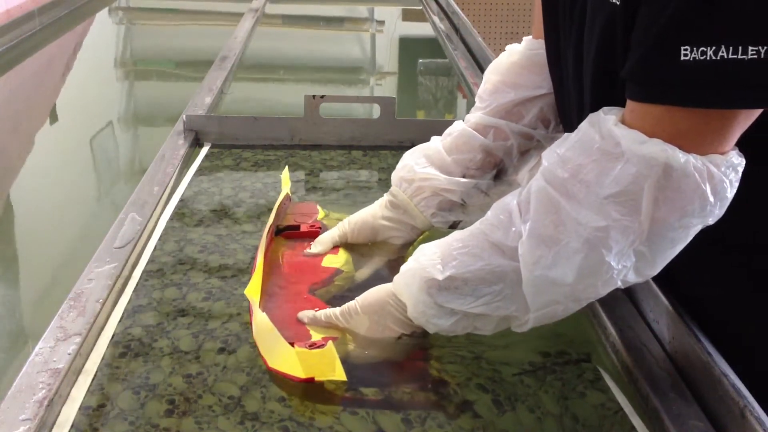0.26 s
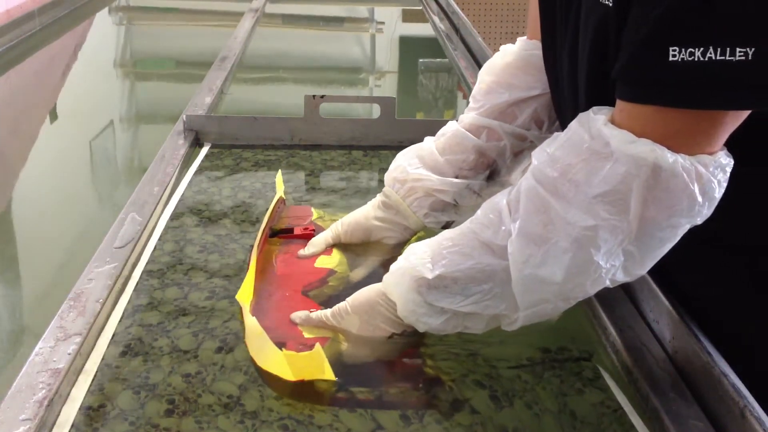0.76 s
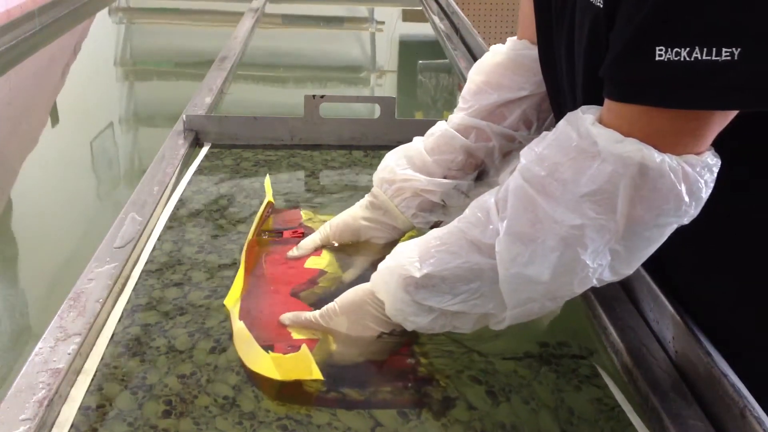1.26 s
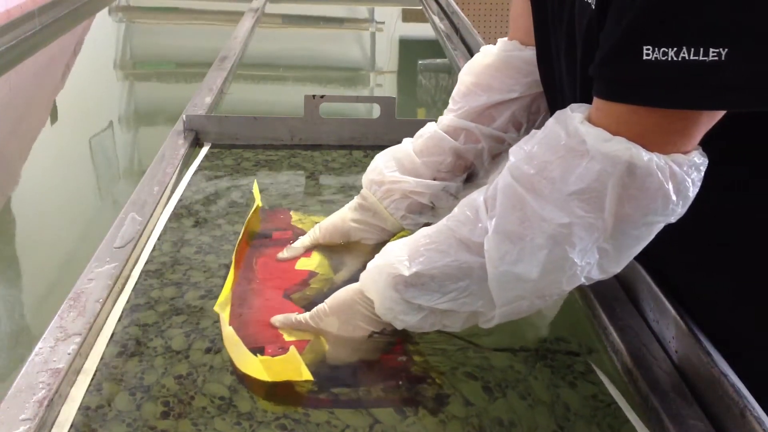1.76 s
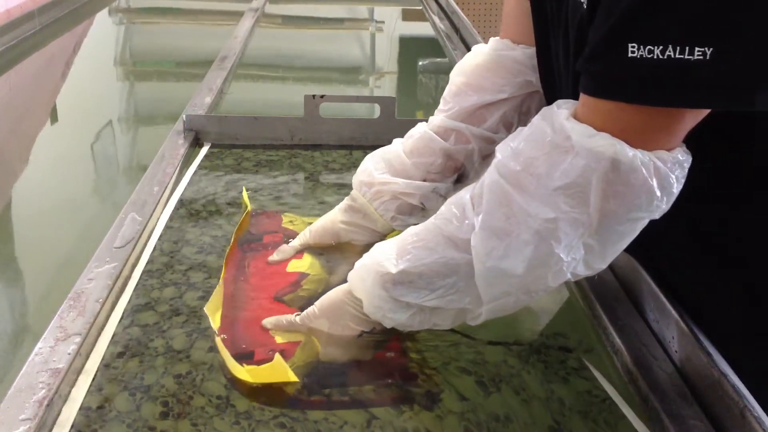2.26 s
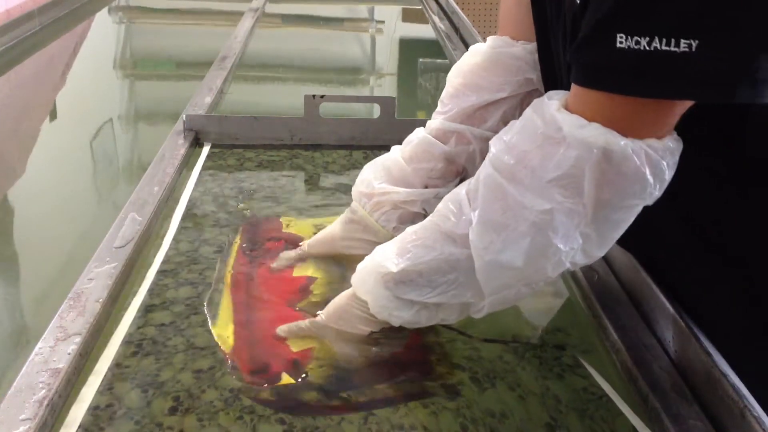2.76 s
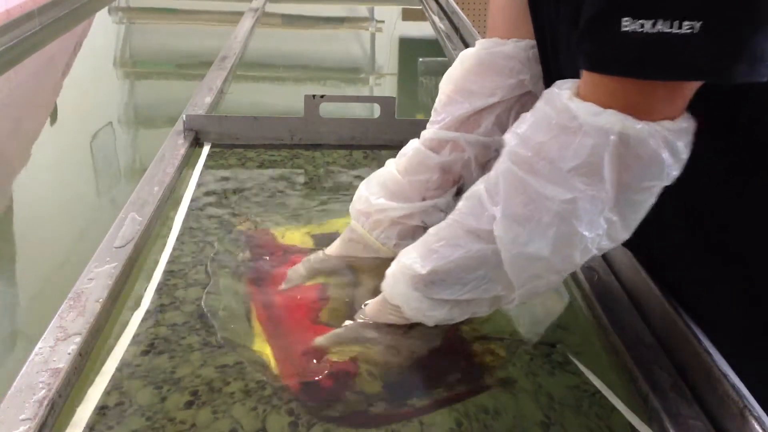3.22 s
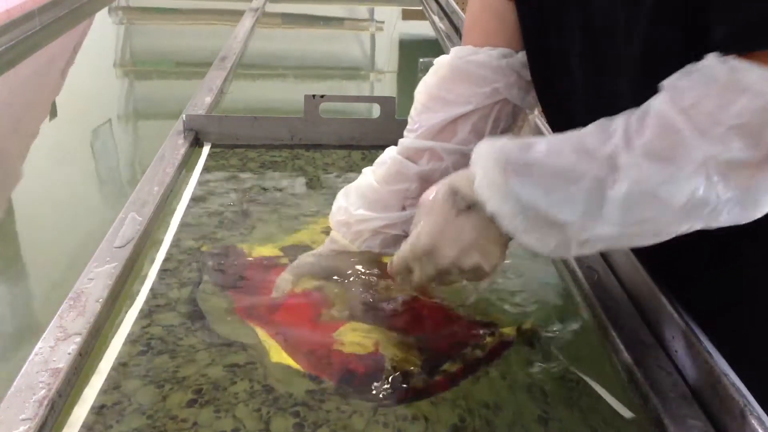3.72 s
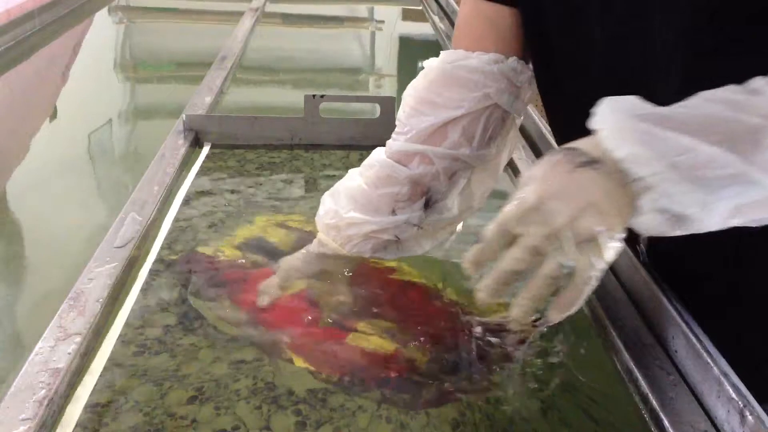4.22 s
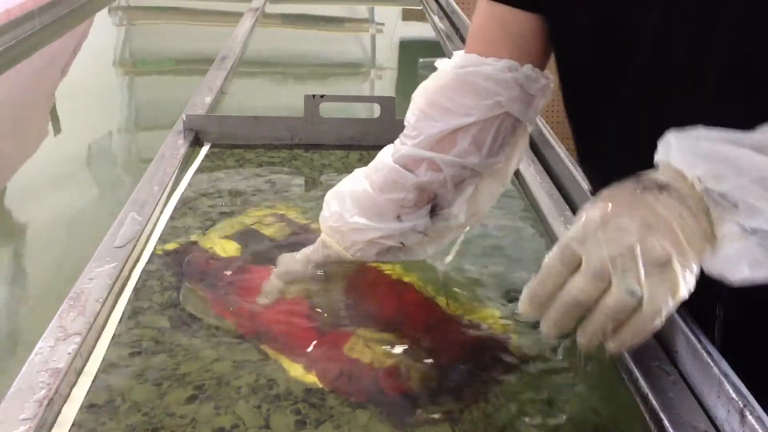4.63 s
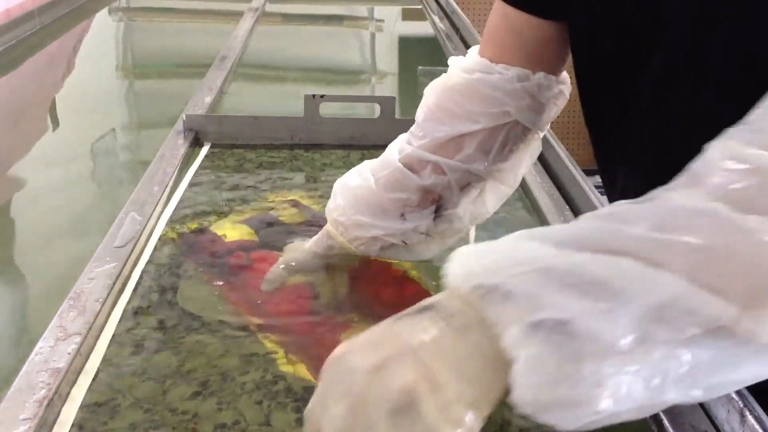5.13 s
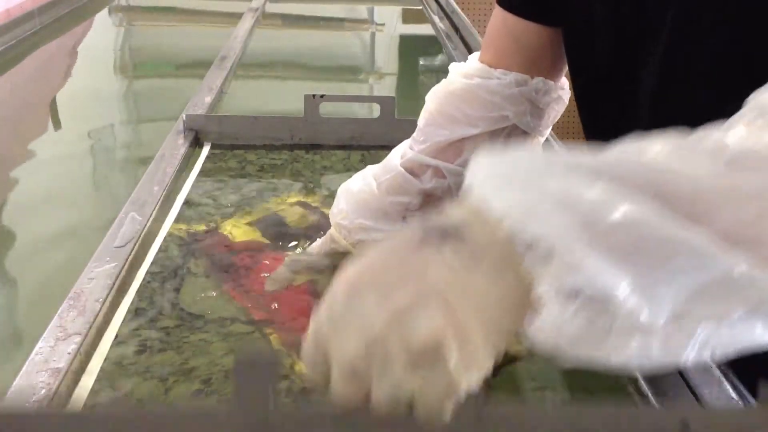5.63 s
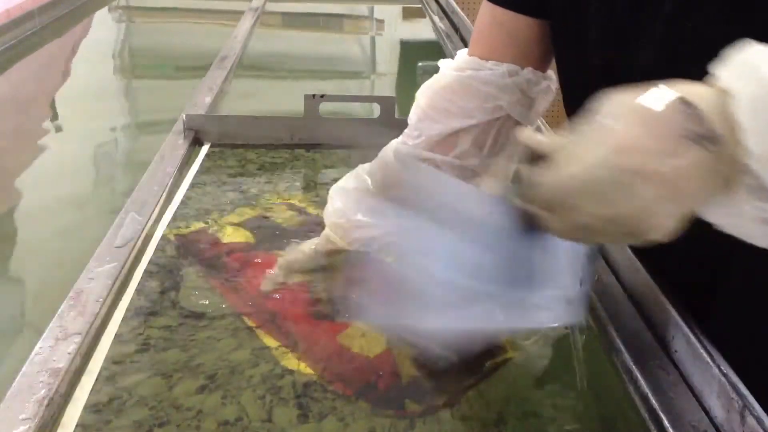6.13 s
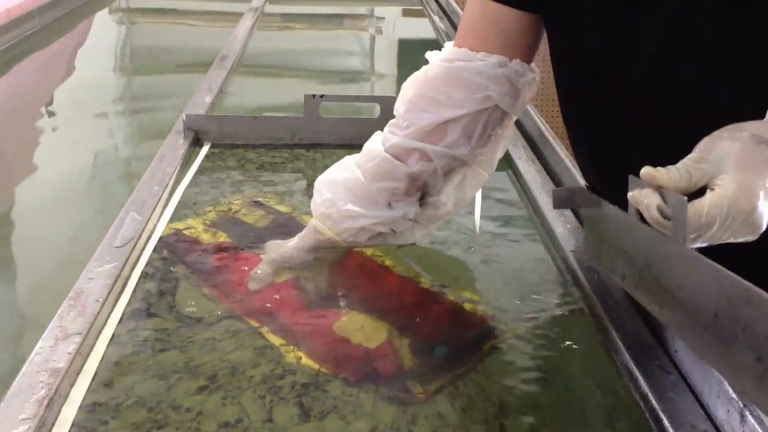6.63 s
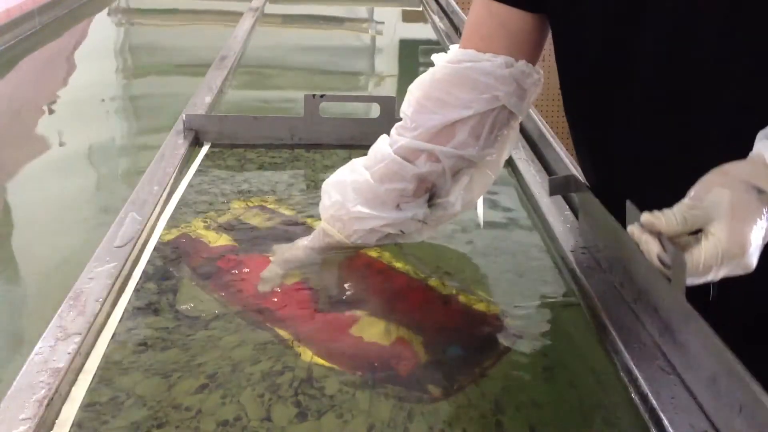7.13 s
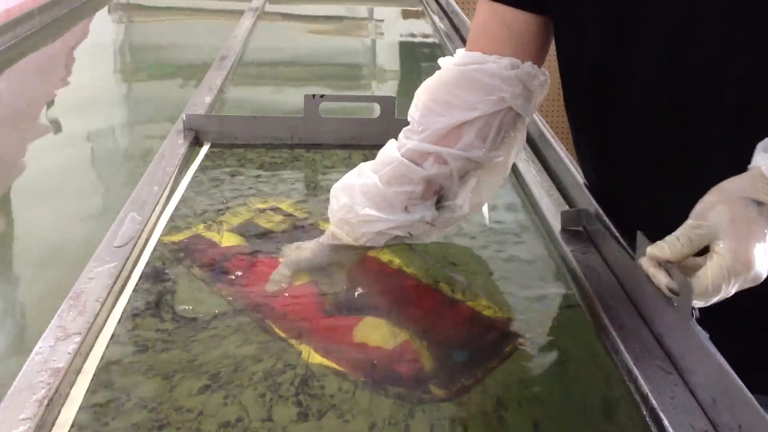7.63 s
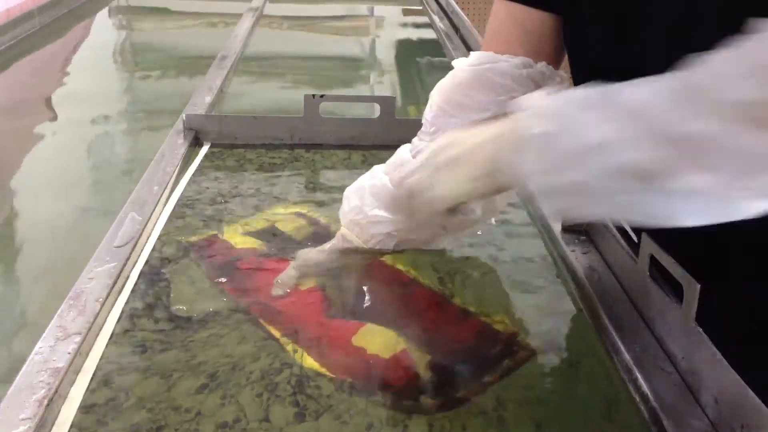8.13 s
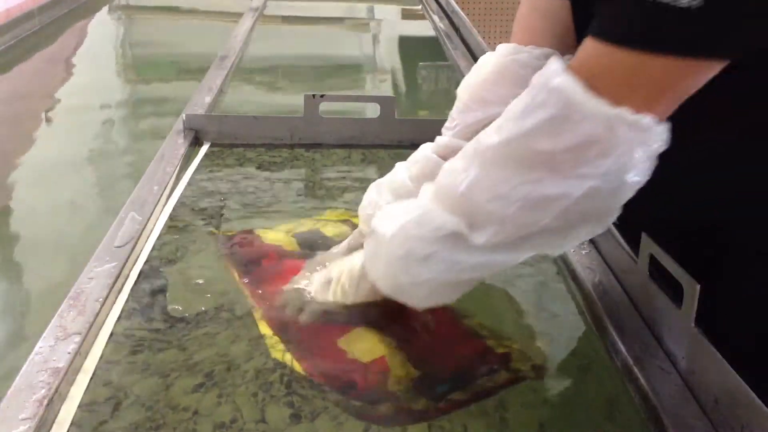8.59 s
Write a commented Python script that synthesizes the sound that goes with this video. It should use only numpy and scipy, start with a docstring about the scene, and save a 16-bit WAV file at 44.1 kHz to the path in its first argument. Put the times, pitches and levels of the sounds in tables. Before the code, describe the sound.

A quiet, echoing open workshop: soft airy background, a faint low motor hum wavering slightly, a high pulsing cricket trill in phrases, and a distant bird repeating short falling whistles throughout. For the first 2.5 seconds little else happens, only a few tiny fabric ticks. From about 2.7 wet plastic sleeves and gloves begin to rustle, growing from 3.4 with crisp snaps and small bubbly drips ringing close by. A soft dull bump comes at 4.6, and rustling continues. At 5.45 to 5.55 a steel bar gives several quick light knocks as it is lifted, followed by more crackles until 6.1. After a brief lull, metal lands at 6.9, then clatters hard and fast from 7.15 to 7.65, bright and sharp with dull thumps beneath, loudest near 7.4 to 7.6. The steel rings and decays through the hall while sleeves swish around 7.8 to 8.7, ending with bird notes.

```python
"""A motor hums, a cricket trills and a far bird repeats a falling call in an open, echoing workshop.
Gloved hands hold a part under water in a steel dipping tank: sleeves rustle, drops ring as bubbles.
A steel divider bar is lifted off the rim with light knocks, then set down with a clatter.
Hum, trill and call are tones; rustle is filtered noise; the bar's contacts excite decaying steel modes."""
import sys
import numpy as np
from scipy import signal
from scipy.fft import rfft, irfft, next_fast_len
from scipy.io import wavfile

SR = 44100
rng = np.random.default_rng(int(sys.argv[2]) if len(sys.argv) > 2 else 0)


def generate_wav(sig):
    """Save sig (samples, or channels by samples) to the path in sys.argv[1] as 16-bit PCM at SR."""
    pcm = np.round(np.clip(np.atleast_2d(sig).T, -1, 1) * 32767).astype(np.int16)
    wavfile.write(sys.argv[1], SR, pcm)


def amplitude_ratio(level_db):
    """Convert a level in decibels to the matching linear amplitude (field) ratio."""
    exponent = np.asarray(level_db, float) / 20
    return 10 ** exponent


N = 390726

# clearest modes of the struck tank [f/Hz, level/dB]
STEEL_MODES = [(178, -51), (194, -47.5), (223, -48), (317, -40.5), (345, -32.5), (375, -35), (490, -46),
               (565, -35.5), (618, -37.5), (721, -32.5), (802, -41), (856, -47), (1293, -47.5), (2575, -44),
               (3250, -56.5), (3800, -42.5), (4134, -40.5), (4550, -41.5), (5330, -44), (5560, -41.5),
               (5830, -29.5), (6130, -31.5), (6280, -42.5), (6700, -58), (7100, -45.5), (7257, -33.5),
               (7600, -48), (8107, -46.5), (8890, -46), (11000, -36), (11996, -36)]
# relative strength of the wet sleeves and gloves moving [t/s, level/dB]
RUSTLE = [(0.0, -88), (0.96, -79.5), (1.93, -78), (2.6, -76), (2.75, -72.5), (3.24, -74.5), (3.43, -63),
          (3.52, -68.5), (3.68, -65), (4.2, -69.5), (4.555, -71.5), (4.57, -59.5), (4.63, -61.5),
          (4.74, -67.5), (4.95, -64.5), (5.3, -71), (5.49, -65.5), (5.69, -63), (5.76, -62), (5.95, -62.5),
          (6.1, -67), (6.3, -68.5), (6.9, -75), (7.8, -53.5), (8.06, -68), (8.294, -60.5), (8.628, -68),
          (8.86, -81.5)]
DEEPEST_HZ = 106   # the steel sends out little below this


def in_time(rows):
    """Linear interpolation: the columns of a table as curves over all samples."""
    s, *columns = np.transpose(rows)
    return [np.interp(np.arange(N) / SR, s, c) for c in columns]


def at_hz(points, hz):
    """Interpolation on a log-frequency axis: a spectrum read at any frequency."""
    points_hz, points_db = np.transpose(points)
    return np.interp(np.log(hz), np.log(points_hz), points_db)


def hat(hz, centres, k):
    """Partition of unity: the share of centre k; neighbouring shares cross-fade and add up to 1."""
    return np.interp(np.log(hz), np.log(centres), np.arange(len(centres)) == k)


def rms_one(x):
    """Normalisation to unit mean power."""
    return x / np.sqrt(np.mean(x ** 2) + 1e-20)


def drift(rate):
    """Slow random modulation: normal points of spread 1, rate per second, joined by lines."""
    return np.interp(np.arange(N) * rate / SR, np.arange(1000), rng.standard_normal(1000))


def band(x, low_hz, high_hz):
    """Butterworth band-pass filtering."""
    edges_hz = [low_hz, min(high_hz, .45 * SR)]
    return signal.sosfilt(signal.butter(2, edges_hz, "band", fs=SR, output="sos"), x)


def coloured(x, spectrum):
    """Linear filtering: the sound's spectrum is multiplied by a magnitude curve."""
    size = next_fast_len(len(x))
    hz = np.linspace(1, SR / 2, size // 2 + 1)
    return irfft(rfft(x, size) * amplitude_ratio(at_hz(spectrum, hz)), size)[:len(x)]


def puffs(times, levels_db, lengths, grit=0):
    """Impulsive noise: abrupt onset, exponential decay, energy independent of length; grit adds lumps."""
    out = np.zeros(N)
    lumps = np.abs(rng.standard_normal(N // 40 + 1)).repeat(40)[:N] ** grit
    noise = rng.standard_normal(N) * lumps
    for s, level_db, length in zip(times, levels_db, lengths):
        start = round(s * SR)
        part = out[start:][:SR // 5]
        decay = np.exp(-np.arange(len(part)) / SR / max(length, 1e-4))
        burst = decay * noise[start:][:len(part)]
        part += amplitude_ratio(level_db) * burst / np.sqrt(np.sum(burst ** 2))
    return out


def air():
    """Broadband background: random noise shaped by a spectrum, its level wandering slowly."""
    # spectral density of the air sound [f/Hz, relative level/dB per Hz]
    air_spectrum = [(30, -33), (60, -32), (100, -9), (160, 2.5), (230, -1), (330, 4), (500, -1.5),
                    (1000, -5.5), (2500, -13.5), (5000, -12.5), (8400, -18), (9000, -24.5), (12000, -15),
                    (15500, -14.5)]
    level_db = -67 + 1.0 * drift(2.8)
    return amplitude_ratio(level_db) * rms_one(coloured(rng.standard_normal(N), air_spectrum))


def rumble():
    """Distant rumble: low band-limited noise under a level envelope."""
    # strength of the rumble [t/s, level/dB]
    rumble_levels = [(0.0, -102), (3.96, -77.5), (5.29, -99), (5.48, -69), (5.69, -71), (6.27, -81),
                     (6.9, -66), (7.8, -64), (8.4, -74), (8.7, -69), (8.86, -78)]
    level_db, = in_time(rumble_levels)
    return amplitude_ratio(level_db) * rms_one(band(band(rng.standard_normal(N), 100, 180), 70, 146))


def motor():
    """Harmonic series on the turning rate: a casing resonance lifts the overtone that meets it."""
    # motor speed [t/s, turns per s]
    speed = [(0.0, 24.1), (0.32, 23.9), (1.0, 24.4), (1.93, 24.8), (2.4, 24.7), (2.9, 24.3), (4.39, 24.2),
             (5.32, 24.65), (6.4, 24.3), (8.86, 24.3)]
    # overtones of the turning rate [multiple of the rate, relative level/dB]
    overtones = [(4, -92), (5, -96), (6, -78), (7, -77.5), (8, -82.5), (9, -76), (10, -81), (11, -84.5),
                 (12, -89.5), (13, -89.5), (14, -93.5)]
    # even running lifts even overtones and lowers odd ones; load lifts all
    # [t/s, evenness/dB, load/dB]
    running = [(0, 7, -3), (.34, 3, -2), (.9, 4, -0.5), (1.3, 2.5, 2), (2.45, 4.5, 1.5), (2.7, -4, -1.5),
               (3.6, -2.5, -1), (4.4, -1.5, -2), (4.9, -0.5, -1), (5.4, -4.5, 0), (5.9, -8, -3),
               (6.4, -2, -1.5), (8.86, -8.5, 3)]
    casing_hz, casing_wide_hz, casing_db = 198.4, 3.7, 10
    waver_rad = 1.2   # spread of each overtone's phase wander
    turns, = in_time(speed)
    even_db, load_db = in_time(running)
    phase, out = 2 * np.pi * np.cumsum(turns) / SR, 0
    for k, db in overtones:
        casing_lift_db = casing_db / (1 + ((k * turns - casing_hz) / casing_wide_hz) ** 2)
        parity_db = even_db * np.cos(np.pi * k)
        level_db = db + casing_lift_db + load_db + parity_db + 2.65 * drift(2.2)
        angle = k * phase + waver_rad * drift(7.9) + 2 * np.pi * rng.random()
        out = out + amplitude_ratio(level_db) * np.sin(angle)
    return np.sqrt(2) * out


def cricket():
    """Stridulation: each wing stroke gates a tone of uneven strength; far insects merge into hiss."""
    # phrases [first stroke t/s, level/dB, fade/dB per s]
    phrases = [(.007, -72, 1.5), (2.207, -71, 4), (3.915, -75, -1), (5.124, -72, 8)]
    # wing tones [f/Hz, relative level/dB]
    wings = [(8320, 4), (8100, -1.5)]
    strokes_per_s, swell_s, dip_db = 16.55, 0.36, 5   # each phrase swells in from a dip
    t = np.arange(N) / SR
    start, level_db, fade_db = np.transpose(phrases)
    phrase = np.maximum(np.searchsorted(start, t + .5 / strokes_per_s) - 1, 0)
    since = t - start[phrase]
    pulse = np.exp(2.9 * (np.cos(2 * np.pi * strokes_per_s * since) - 1))
    stroke = pulse * amplitude_ratio(2.5 * drift(25))
    tone = sum(amplitude_ratio(db) * np.sin(2 * np.pi * hz * t + 1.2 * drift(48)) for hz, db in wings)
    chorus = band(band(rng.standard_normal(N), 7030, 8900), 7100, 8630)
    effort_db = level_db[phrase] - fade_db[phrase] * since - dip_db * np.exp(-since / swell_s)
    return amplitude_ratio(effort_db) * rms_one(stroke * tone) + amplitude_ratio(-73.5) * rms_one(chorus)


def bird():
    """Multipath propagation: distance smears gliding notes into noise bands with echoing tails."""
    # notes [t/s, starting f/Hz, fall/Hz, level/dB]
    notes = [(.04, 4820, -6, -80), (.28, 5840, 103, -81), (0.716, 4690, 463, -73), (.88, 3730, 149, -74),
             (.98, 7100, 400, -76), (1.645, 4850, 128.5, -79), (2.858, 4460, 324, -70.5),
             (3.029, 3600, 4.5, -69), (4.718, 3740, 90, -67.5), (6.556, 4580, 445, -69.5),
             (6.678, 3640, 65, -67.5), (8.655, 3750, 67.5, -70.5), (8.821, 3700, 75, -69.5)]
    note_s, attack_s, tail_s = .14, 0.0061, 0.12
    out = np.zeros(N)
    t = np.arange(SR // 2) / SR
    for s, from_hz, fall_hz, level_db in notes:
        b, a = signal.butter(2, 134 + fall_hz, fs=SR)   # a steeper fall is blurred more widely
        blur = rms_one(signal.lfilter(b, a, rng.standard_normal((2, len(t)))))
        pitch_hz = np.interp(t, [0, note_s], [from_hz, from_hz - fall_hz])
        phase = 2 * np.pi * np.cumsum(pitch_hz) / SR
        shape = np.minimum(t / attack_s, 1) * np.exp(-np.maximum(t - note_s, 0) / tail_s)
        note = amplitude_ratio(level_db) * shape * (np.cos(phase) * blur[0] + np.sin(phase) * blur[1])
        part = out[round(s * SR):][:len(t)]
        part += note[:len(part)]
    return out


def rustle():
    """Frictional noise: each fold adds random crackles and a swish in its own independently varying band."""
    # spectral density of the fabric [f/Hz, relative level/dB per Hz]
    fabric = [(400, -19), (900, -1), (1500, -2.5), (3600, -1.5), (7300, 3.5), (9000, -1), (11000, -6),
              (14000, -2), (15500, -12.5)]
    swing_db, patchy_db, crackle_share = 1.6, 3.5, .35
    level_db, = in_time(RUSTLE)
    together, out = drift(24), 0
    for hz in 600 * 2 ** np.arange(0, 4.7, 2 / 3):
        crackles_per_s = 250 * amplitude_ratio(3.5 * drift(25) + 3.0 * together)
        sizes = amplitude_ratio(4.2 * np.minimum(rng.exponential(1, N), 5)) * (rng.random(N) < crackles_per_s / SR)
        crackle = signal.lfilter([1], [1, -.97], sizes) * rng.standard_normal(N)   # short decays
        swish = rng.standard_normal(N) * amplitude_ratio(swing_db * together + patchy_db * drift(15))
        fold = crackle_share * rms_one(crackle) + swish
        out = out + band(fold, hz / 2 ** (1 / 3), hz * 2 ** (1 / 3))
    return amplitude_ratio(level_db + 4.0) * rms_one(coloured(out, fabric))


def snaps():
    """Impulsive radiation of fabric and film: milliseconds of bright noise, tilted between low and top."""
    # single snaps [t/s, relative level/dB, tilt toward the dull side/dB]
    snap_rows = [(1.489, -43, -3.5), (1.596, -49, -23), (2.4094, -51, -9.5), (2.4474, -48, 9),
                 (2.7412, -50, -7), (2.808, -44, 7), (2.931, -45, -1), (3.0425, -47, 7), (3.336, -43, -1),
                 (3.429, -39, 10), (3.543, -43, 1), (3.614, -49, 14), (3.66, -41, 11), (3.6904, -43, 4.5),
                 (3.775, -39, 10.5), (3.897, -40, 12), (3.99, -40, 22), (4.024, -41, 3), (4.14, -58, 12),
                 (4.194, -45, 27), (4.229, -40, 15), (4.304, -43, 4), (4.364, -45, 2), (4.498, -46, 14.5),
                 (4.652, -41.5, -6), (4.778, -39, 8), (4.9861, -40, 14), (5.175, -47, 3), (5.187, -51, 12),
                 (5.243, -43, 20), (5.3366, -39.5, 18), (5.373, -43, 18), (5.419, -41, 0),
                 (5.7387, -36, 20), (5.797, -35.5, 19), (6.0293, -39.5, 2), (6.117, -54, 13),
                 (8.118, -36, -3.5), (8.161, -44, -9), (8.224, -42, 31), (8.5187, -42.5, 23),
                 (8.6705, -55, 12)]
    s, level_db, tilt_db = np.transpose(snap_rows)
    lasts = np.full(len(s), .0025)
    middle = puffs(s, level_db + 15.5 - np.abs(tilt_db) / 5, lasts)
    low = puffs(s, level_db - 19 + tilt_db / 2 + 20.5, lasts)
    top = puffs(s, level_db - 16 - tilt_db / 2 + 26.0, lasts)
    middle = band(band(middle, 3500, 9900), 5300, 9900)
    return middle + band(low, 2200, 6300) + band(top, 11200, 15500)


def drips():
    """Bubble resonance: a damped sine climbs in pitch near the surface; small ones follow the hands."""
    # single drops [t/s, relative level/dB, f/Hz]
    drops = [(2.6963, -61, 1820), (2.9916, -57, 3540), (3.5623, -56, 2580), (3.6174, -57, 1530),
             (3.636, -58, 1540), (3.64, -46, 4400), (3.6554, -51, 3270), (3.704, -49, 3840),
             (3.723, -52.5, 2400), (3.7644, -57, 2080), (3.925, -53, 4410), (3.885, -57, 2000),
             (4.0956, -55, 2390), (4.098, -64, 1900), (4.1694, -64, 3730), (5.1076, -62, 2260),
             (6.0591, -62, 3470), (6.1165, -55, 3237)]
    cycles, small_cycles, rise = 55.0, 20, 0.089   # cycles to fall 60 dB; pitch climb
    out, t = np.zeros(N), np.arange(SR // 10) / SR
    when, size, pitch = rng.random((900, 3)).T
    when = when * (N - SR // 10)
    at = when.astype(int)
    moving_db = in_time(RUSTLE)[0][at]
    small_db = moving_db + 10.0 + 5.0 * pitch - 12 * size + 2.0 * drift(12)[at]
    small = np.transpose([when / SR, small_db, 1700 * 5.5 ** pitch])
    for k, (s, level_db, hz) in enumerate(np.vstack([drops, small])):
        life = t * hz / (cycles if k < len(drops) else small_cycles)
        ring = np.sin(2 * np.pi * hz * t * (1 + rise * life))
        out[round(s * SR):][:len(t)] += amplitude_ratio(level_db - 60 * life) * ring
    return out


def wall_echoes(close):
    """Early reflections: two quick echoes off the tank walls follow the direct sound."""
    walls = np.zeros(SR // 30)
    walls[[0, round(.005 * SR), round(.017 * SR)]] = 1, .4, .3
    return signal.fftconvolve(close, walls)[:N]


def knock():
    """Damped impact: the wet glove bumps the tank wall as a soft burst of low-band noise."""
    return band(puffs([4.568], [-10], [0.02]), 142, 410)


def jolts():
    """Structure-borne shock: heavy landings push the microphone through the floor, one low pulse each."""
    # heavy landings [t/s, level/dB]
    landings = [(6.935, -47), (7.165, -58), (7.572, -47.5)]
    peak_s = .0025
    out, t = np.zeros(N), np.arange(SR // 10) / SR
    for s, level_db in landings:
        out[round(s * SR):][:len(t)] += amplitude_ratio(level_db) * t / peak_s * np.exp(1 - t / peak_s)
    return out


def steel_answer(dense, modes, modes_db, ring_s, tail_share, tail_db):
    """Modal impulse response of steel and hall: one row per range, dying band by band."""
    # centres of the ranges that contacts drive, dull to bright [f/Hz]
    ranges_hz = [280, 600, 1100, 2500, 6500, 12000]
    # tank and hall die away together [f/Hz, t60/s]
    tail = [(100, 0.76), (250, 3.73), (500, 2.03), (1000, 1.7), (2000, 0.96), (4000, 0.43), (8000, 0.5),
            (14000, 0.15)]
    early_t60_s, short_over_hz = 0.42, 399
    bands_hz = 40 * 2 ** np.arange(0, 8.7, .5)
    t = np.arange(3 * SR) / SR
    clear = 0
    for hz, db in modes:
        fall_db = 60 * t / ring_s * (hz / ranges_hz[0])   # higher modes ring shorter
        clear = clear + amplitude_ratio(db + modes_db - fall_db) * np.sin(2 * np.pi * hz * t)
    ringing = rfft(rms_one(coloured(rng.standard_normal(len(t)), dense)) + clear)
    rows, all_hz = np.zeros((len(ranges_hz), len(t))), np.linspace(1, SR / 2, len(ringing))
    for k, hz in enumerate(bands_hz):
        build = 1 - np.exp(-t * hz / 0.38)   # lows take longer to start
        # tail_share shortens the tail ever more over one octave, then by the same ratio above it
        shorter = (short_over_hz / np.clip(hz, short_over_hz, 2 * short_over_hz)) ** tail_share
        late = amplitude_ratio(tail_db - 60 * t / (at_hz(tail, hz) * shorter))
        dying = amplitude_ratio(-60 * t / early_t60_s) + late
        part = irfft(ringing * hat(all_hz, bands_hz, k)) * build * dying
        rows += [hat(hz, ranges_hz, j) * part for j in range(len(rows))]
    return rows / np.sqrt(np.mean(rows[:, :SR // 20] ** 2, axis=1, keepdims=True))


def bar(contacts, reach, answers, range_db, skid_db, skid_s, push_db):
    """Impact excitation: clicks and short skids drive the steel's ranges; the tank floor adds a dull push."""
    # share of the lean that each range takes, bright to dull [ratio]
    lean_share = [0, 0, 0, -.5, -1, 1]
    s, edge_db, weight_db, lean_db, sharp_db = np.transpose(contacts)
    levels = []
    for (edge_reach_db, weight_reach_db), share in zip(reach, lean_share):
        edge = amplitude_ratio(edge_db + edge_reach_db)
        weight = amplitude_ratio(weight_db + weight_reach_db + share * lean_db)
        levels.append(20 * np.log10(np.hypot(edge, weight)))
    levels[0] = levels[0] + sharp_db
    clicks, sign = np.zeros((len(levels), N)), rng.choice([-1, 1], len(s))
    clicks[:, np.round(s * SR).astype(int)] = sign * amplitude_ratio(np.array(levels))
    out = amplitude_ratio(push_db) * band(band(band(clicks[-1] + 1e-18, 100, 200), 95, 230), 95, 230)
    for answer, click, level_db, more_db in zip(answers[::-1], clicks, levels, range_db):
        drive = click + puffs(s, level_db + skid_db, np.full(len(s), skid_s), grit=1)
        out += amplitude_ratio(more_db) * signal.fftconvolve(drive, answer)[:N]
    return band(band(out, DEEPEST_HZ, SR), DEEPEST_HZ, SR)


def rail_knocks():
    """Light impacts: the bar knocks the cross rail as it is lifted, exciting the rail's modes."""
    # contacts [t/s, edge level/dB, weight level/dB, lean toward the deepest range/dB,
    # extra sharpness at the very top/dB]
    lift = [(5.4484, -35.5, -38, 0.5, 0.92), (5.4693, -36.5, -43.5, -5, 1), (5.4895, -38, -38.5, -2.5, 1),
            (5.5398, -37, -38, -1, 1)]
    # reach of a contact into each range, bright to dull [from the edge/dB, from the weight/dB]
    rail_reach = [(-0.5, -30), (-1, -30), (-7, -16), (-20, 0.5), (-30, -2.5), (-32.5, -4.5)]
    # clearest rail modes [f/Hz, relative level/dB]
    rail_modes = [(316, -54), (409.1, -48.5), (667, -48), (791.3, -60.5), (855.9, -46.5), (972, -71),
                  (1220, -61), (1809, -58), (1911, -52.5), (2050, -66), (2374, -70)]
    # dense rail modes [f/Hz, relative level/dB per Hz]
    rail_dense = [(50, -55), (90, -37), (200, -7.5), (270, -8), (400, -6), (540, -7), (620, -10.5),
                  (700, -0.5), (900, -6), (1040, -6), (1140, -15), (1300, -10.5), (1500, -13.5),
                  (1750, -12.5), (1920, -13), (2100, -14.5), (2300, -19), (6000, -22.5), (15500, -35)]
    answers = steel_answer(rail_dense, rail_modes, modes_db=45.5, ring_s=2.6, tail_share=0.6, tail_db=8.0)
    return bar(lift, rail_reach, answers, range_db=[-32.5, -20.5, -10.0, -11.5, -9.5, -11.0],
               skid_db=-1.5, skid_s=0.02, push_db=18)


def tank_blows():
    """Repeated impact: the bar clatters on the tank, its edge exciting bright modes, its weight dull ones."""
    # contacts [t/s, edge striking level/dB, weight landing level/dB,
    # lean toward the deep wall panels/dB, extra sharpness at the very top/dB]
    blows = [(4.5701, -53, -64, 5.5, 4), (6.9337, -25, -31, -9, 2), (6.9594, -58, -32.5, 1.5, 0),
             (7.0471, -34, -34.5, 1.5, -6.5), (7.1539, -13.5, -34, 4, 8), (7.165, -24.5, -39.5, 9, 1),
             (7.212, -12.5, -27.5, -4.5, 0), (7.2394, -16, -33, 11, 6), (7.2787, -19.5, -26.5, 1.5, -9),
             (7.3601, -24, -35, 3.5, -10), (7.375, -18.5, -37, -1, 1.5), (7.392, -31, -49.5, 5.5, 6.5),
             (7.4085, -6, -30, 6.5, -4), (7.4135, -5.5, -25.5, 3, 4), (7.4247, -27.5, -31, 3.5, 4.5),
             (7.4493, -11.5, -34.5, -6.5, 2), (7.4855, -10, -30, 8, 3), (7.5034, -20.5, -29, 2, -0.5),
             (7.527, -9, -42, 1.5, -11.5), (7.5388, -13, -32, -1.5, 2), (7.5684, -5.5, -45.5, 2.5, 3.5),
             (7.5863, -19.5, -38, -7.5, 12.5), (7.6198, -32.5, -34.5, 10.5, -2), (7.6594, -28, -42, 14, 1),
             (7.997, -45.5, -61, 5, 3)]
    # reach of a contact into each range, bright to dull [from the edge/dB, from the weight/dB]
    tank_reach = [(-1, -37.5), (-1.5, -35), (-13.5, -20), (-53, -3.5), (-27.5, -1), (-27.5, 0.5)]
    # dense tank modes [f/Hz, relative level/dB per Hz]
    tank_dense = [(50, -88), (90, -33), (140, -36), (185, -11), (255, -13.5), (345, -5), (420, 0.5),
                  (480, 2.5), (600, 7.5), (760, -3), (1300, -12), (2200, -12), (2700, -11.5), (3800, -6.5),
                  (4900, -7), (6200, -4), (8800, -9.5), (10000, -18.5), (15500, -25)]
    answers = steel_answer(tank_dense, STEEL_MODES, modes_db=24.5, ring_s=1.84, tail_share=0, tail_db=1)
    return bar(blows, tank_reach, answers, range_db=[-30.0, -22.0, -11.5, -7.5, -10.5, -11.0],
               skid_db=-5.5, skid_s=0.013, push_db=10)


def steel_contacts():
    """Selective mode excitation: each contact gives a short burst, and modes near its pitch ring on."""
    # steel contacts [t/s, relative level/dB, f/Hz, ring beside the burst/dB]
    contact_rows = [(6.9338, -24, 6140, -10), (6.9345, -53, 690, 15), (6.94, -58, 179, 10),
                    (7.0474, -35, 6510, -14), (7.156, -39, 3250, 3), (7.157, -45.5, 340, 13),
                    (7.213, -13, 6100, -14), (7.2125, -39, 750, 15.5), (7.24, -42, 1293, 13),
                    (7.4135, -15, 6000, -16), (7.412, -37.5, 352, 12.5), (7.415, -22, 2575, 11),
                    (7.414, -25.5, 4160, -1), (7.44, -29, 7200, 6), (7.486, -38.5, 352, 14.5),
                    (7.501, -18.5, 3800, -13.5), (7.526, -30, 2640, 7), (7.5398, -14, 5600, -16.5),
                    (7.43, -41, 600, 15), (7.545, -38.5, 596, 11), (7.5682, -2.5, 6650, -16.5),
                    (7.578, -6.5, 6040, -18.5), (7.5854, -13, 6460, -19), (7.5947, -14, 7500, -18.5)]
    burst_per_s, spot_octaves, spot_t60_s = 2900, 0.16, 0.56   # t60 of the ring at 1 kHz, shorter above
    out, t = np.zeros(N), np.arange(SR) / SR
    modes_hz = np.transpose(STEEL_MODES)[0]
    mode_tones = np.sin(2 * np.pi * np.outer(modes_hz, t))
    for s, level_db, hz, ring_db in contact_rows:
        near = np.exp(-(np.log2(modes_hz / hz) / spot_octaves) ** 2)
        near = near * rng.choice([-1, 1], len(modes_hz))
        ring = near @ mode_tones * amplitude_ratio(ring_db - 60 * t / spot_t60_s * (hz / 1000))
        ring = ring * np.minimum(t / 0.0039, 1) * (1 - t)
        burst = t * burst_per_s * np.exp(1 - t * burst_per_s) * np.sin(2 * np.pi * hz * t)
        out[round(s * SR):][:len(t)] += amplitude_ratio(level_db) * (burst + ring)
    return amplitude_ratio(-2.0) * band(out, DEEPEST_HZ, SR)


def scene():
    """Superposition of all sources; the small close sounds reflect off the tank walls."""
    far = air() + rumble() + motor() + cricket() + bird()
    hands = rustle() + wall_echoes(snaps() + drips()) + knock()
    steel = rail_knocks() + tank_blows() + steel_contacts() + jolts()
    return (far + hands + steel)[None]


def low_pass(x):
    """Removes everything above the highest recorded frequency."""
    return signal.sosfilt(signal.butter(12, 15600, fs=SR, output="sos"), x)


def record(dry):
    """Band limiting: a high-pass removes the deep bass; a steep low-pass clears the top above 16 kHz."""
    heard = signal.sosfilt(signal.butter(2, 65, "high", fs=SR, output="sos"), dry)
    heard = signal.sosfilt(signal.cheby2(20, 50, 16000, fs=SR, output="sos"), heard)
    return low_pass(heard)


dry = scene()
out = record(dry)
generate_wav(out)
```